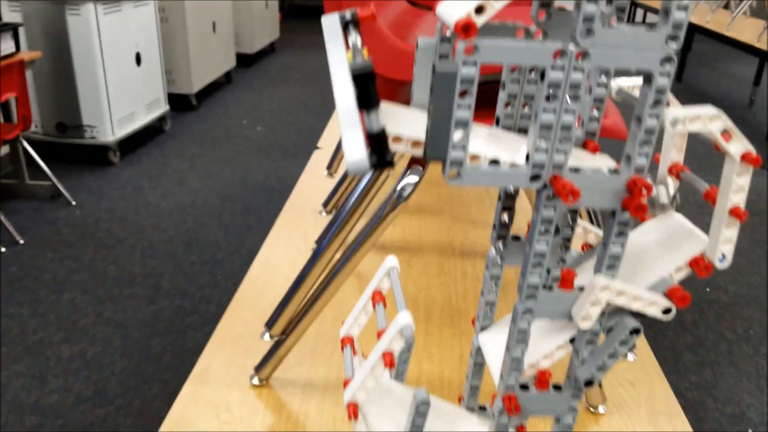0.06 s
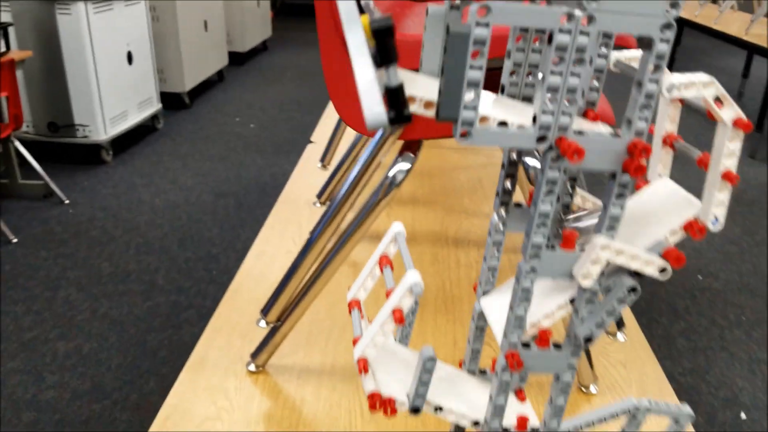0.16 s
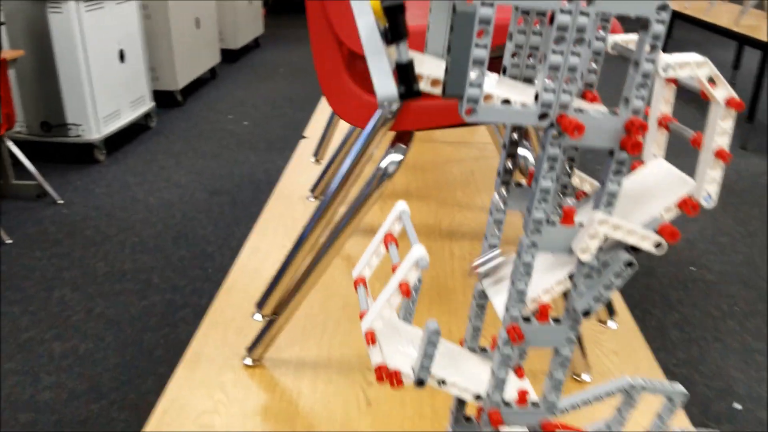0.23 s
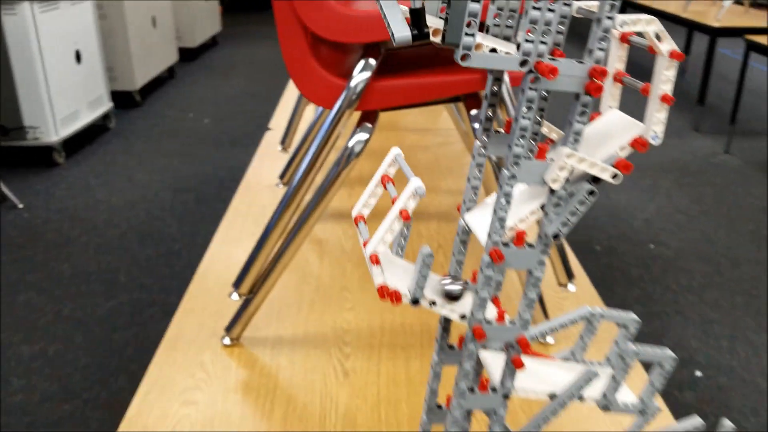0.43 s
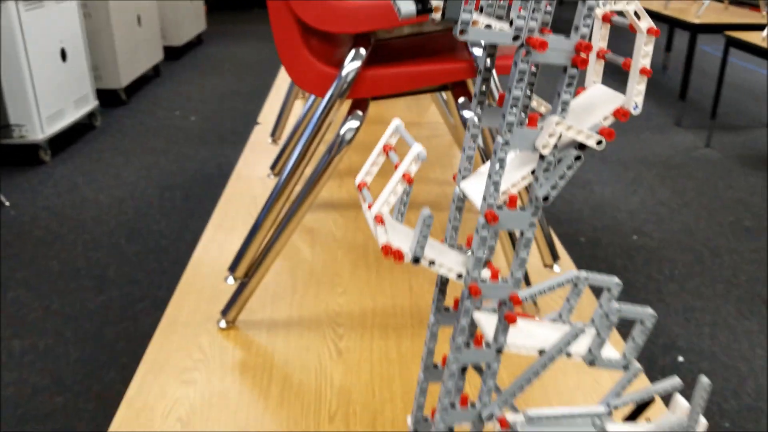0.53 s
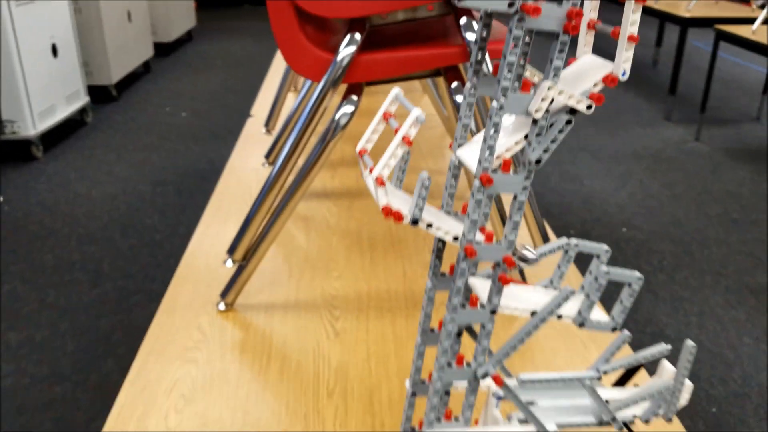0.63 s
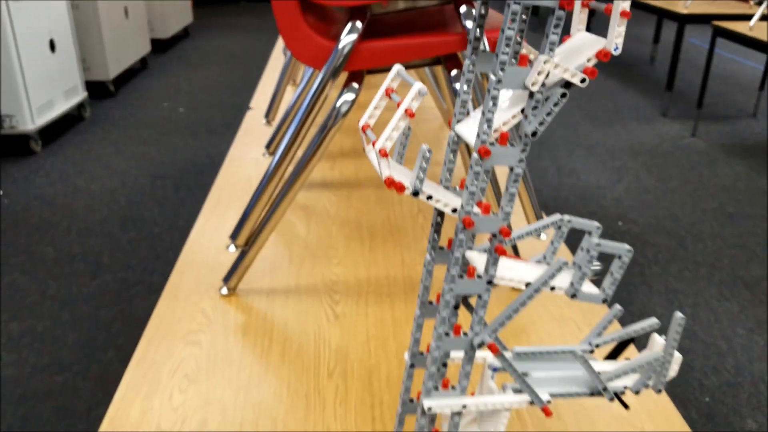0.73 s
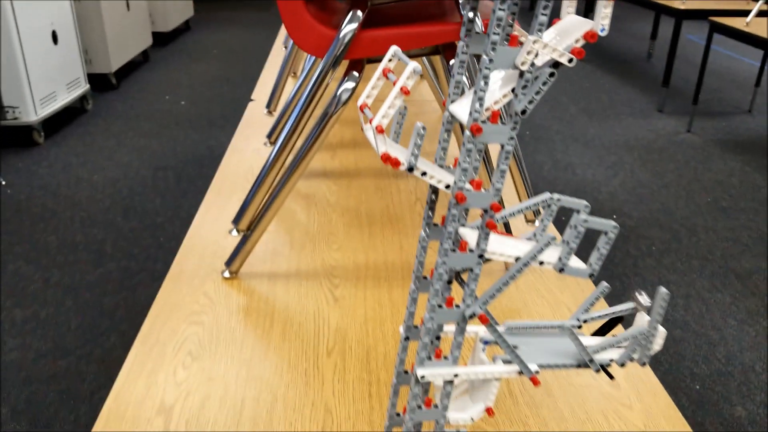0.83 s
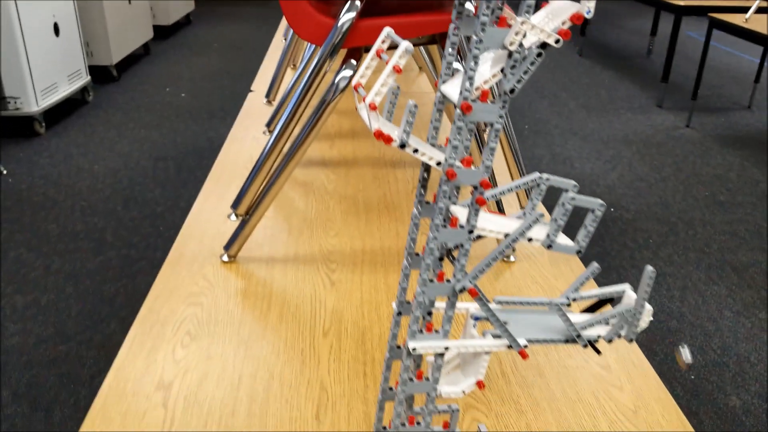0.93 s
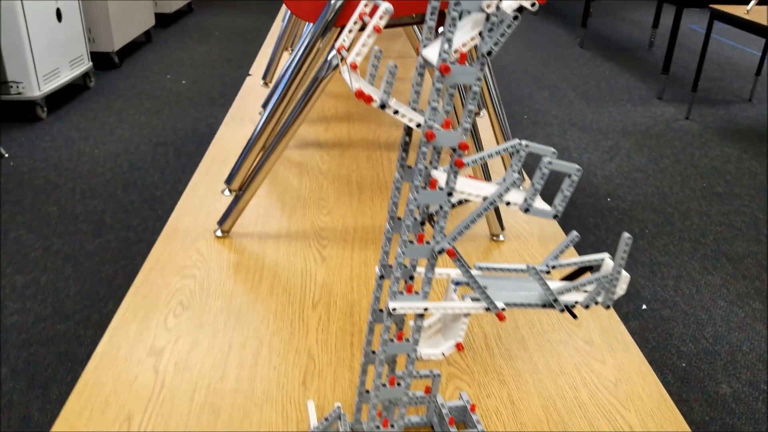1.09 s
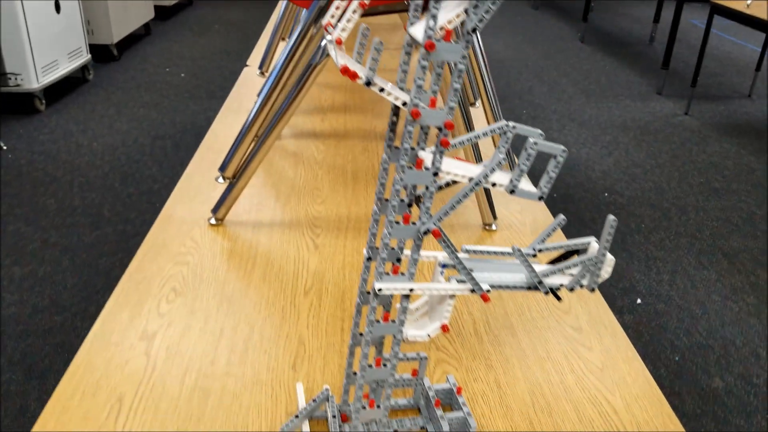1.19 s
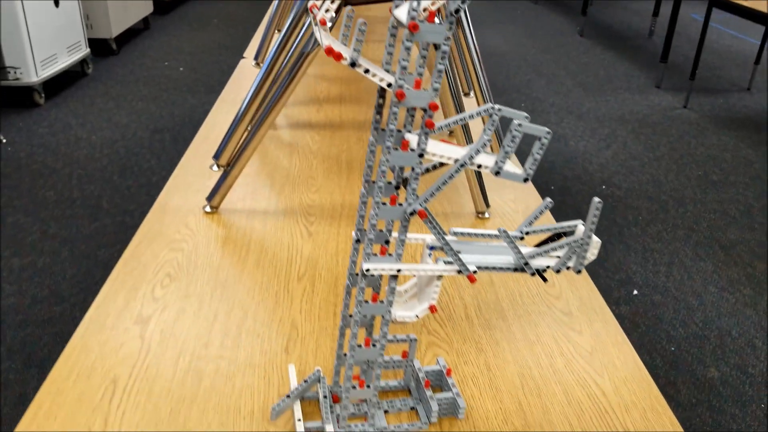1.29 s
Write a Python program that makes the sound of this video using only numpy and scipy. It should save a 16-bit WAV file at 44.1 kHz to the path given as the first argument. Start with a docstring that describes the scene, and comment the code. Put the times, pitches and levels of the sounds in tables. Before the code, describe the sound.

A steel ball drops down a tower of plastic toy slides, giving irregular sharp clicks, a hollow knock and a bright rattling cluster, then a soft dull landing; close microphone, small dry room, faint ventilation.

```python
"""A steel ball drops down a tower of plastic toy slides standing on a classroom table, heard from close by.
Each blow is a shaped noise burst (crack), a longer burst (buzz of the loose beams) and decaying sine waves
(the ringing part). Between blows the ball rolls faintly: sparse random bumps shake the slide.
It lands at the bottom with a dull knock. The table top mirrors every blow with a short delay, and a small
dry room answers, made of fading noise. Ventilation noise, a hum and a low rumble lie underneath."""
import sys
import numpy as np
from scipy import signal
from scipy.fft import rfft, irfft
from scipy.io import wavfile
from scipy.ndimage import uniform_filter1d

SR = 44100
rng = np.random.default_rng(int(sys.argv[2]) if len(sys.argv) > 2 else 0)


def output_pcm(signal):
    """Save a mono or channel-first signal as 16-bit PCM at the path in sys.argv[1].

    Samples are clipped to [-1, 1] before scaling.
    """
    pcm = np.clip(np.atleast_2d(signal).T, -1, 1) * 32767
    wavfile.write(sys.argv[1], SR, np.round(pcm).astype(np.int16))


N = 59535
T = np.arange(N) / SR  # time in seconds
CONTACT_SIZE = 8192  # samples in one crack or buzz
SPREAD_HZ = 3400  # around here the ball's sounds turn from alike to unrelated in left and right
AIR_SPREAD_HZ = 380  # the same for the background


def amp(db):
    """Turn decibels into a gain."""
    return 10 ** (np.asarray(db) / 20)


def unit(x):
    """Scale to an average energy of one per channel."""
    return x / np.sqrt(np.sum(x ** 2) / len(np.atleast_2d(x)))


def fade(t60):
    """Die away exponentially, losing 60 dB in t60 seconds."""
    return np.exp(-np.log(1000) * T / max(t60, 1e-3))


def read(points, hz):
    """Read a table between its points, on a log-frequency axis."""
    f, v = np.array(points).T
    return np.interp(np.log(hz + 1), np.log(f), v)


def axis_hz(x):
    """List the frequencies of a signal's zero-padded spectrum."""
    return np.linspace(0, SR / 2, x.shape[-1] + 1)


def delay(x, s):
    """Start a sound s seconds into the scene."""
    k = int(np.clip(s * SR, 0, N - 1))
    return np.pad(x[:, :N - k], ((0, 0), (k, max(N - k - x.shape[1], 0))))


def colour(x, db):
    """Filter with a gain in dB at each frequency, without any sound ahead of its cause."""
    n = x.shape[-1]
    # folding the cepstrum (the spectrum of the log spectrum) forward makes the filter minimum-phase
    cepstrum = irfft(np.log(amp(db)))
    cepstrum[..., 1:n] *= 2
    cepstrum[..., n + 1:] = 0
    response = np.exp(rfft(cepstrum))
    return irfft(rfft(x, 2 * n) * response)[..., :n]


def stereo(pair, spread_hz):
    """Mix two unrelated signals into left and right: alike in the bass, unrelated in the treble."""
    hz = axis_hz(pair) + 1
    share = hz / np.hypot(hz, spread_hz)
    power = np.array([np.ones_like(hz), share ** 2]) / (1 + share ** 2)
    mid, side = colour(pair, 10 * np.log10(power))
    return np.array([mid + side, mid - side])


def noise():
    """Make two unrelated white noises."""
    return rng.standard_normal((2, N))


def steady(pair, points, spread_hz):
    """Make a coloured stereo sound with an rms of one."""
    coloured = colour(stereo(pair, spread_hz), read(points, axis_hz(pair)))
    return np.sqrt(N) * unit(coloured)


def burst(envelope, count=4, size=40):
    """Densely packed, heavily damped modes of even strength under an envelope."""
    envelope = envelope[:CONTACT_SIZE] + 1e-7
    x = rng.standard_normal((2, CONTACT_SIZE))
    # by turns, follow the envelope in time and flatten the spectrum
    for _ in range(count):
        local_rms = np.sqrt(abs(uniform_filter1d(x ** 2, size)) + 1e-16)
        spectrum = rfft(x * envelope / local_rms)
        x = irfft(spectrum / (abs(spectrum) + 1e-12))
    gate = np.minimum(1, 30 * envelope / envelope.max())  # turns down what is left in the faint end
    return unit(x * gate)


def ventilation():
    """Moving air: steady noise, strongest in the bass."""
    # colour of the air noise: f/Hz, level/dB
    air_colour = [(20, -17), (40, -10), (60, 5), (82, 5.5), (105, -9.5), (170, -17.5), (260, -13.5),
                  (500, -31), (1000, -32), (3000, -37.5), (8000, -41), (15000, -27)]
    return amp(-66.5) * steady(noise(), air_colour, AIR_SPREAD_HZ)


def mains_hum():
    """Mains hum: one steady sine wave, the same in both channels."""
    hum_hz, rms_db = 118.5, -67
    return amp(rms_db) * np.sqrt(2) * np.sin(2 * np.pi * (hum_hz * T + rng.random()))


def low_rumble():
    """Low noise whose level dips and returns, then eases off."""
    # level of the rumble over time: t/s, level/dB
    rumble_level = [(0, -57.5), (.15, -58.5), (.25, -67), (.34, -58.5), (.52, -63.5), (.62, -71),
                    (1.35, -80.5)]
    # colour of the rumble: f/Hz, level/dB
    rumble_colour = [(25, -22), (50, -5.5), (80, 0), (140, -4), (250, -12.5), (450, -26.5), (1200, -37)]
    level_db = np.interp(T, *np.array(rumble_level).T)
    return amp(level_db) * steady(noise(), rumble_colour, AIR_SPREAD_HZ)


def rolling():
    """Tiny bumps under the rolling ball shake the slide, swelling and fading on each stretch."""
    # stretches where the ball rolls along a slide: start t/s, length/s, level/dB
    stretches = [(-.07, 0.14, -56.5), (0.146, 0.27, -62.5), (0.354, 0.1, -61.5), (0.54, 0.12, -68),
                 (0.648, 0.055, -75.5)]
    # colour of the rolling: f/Hz, level/dB
    rolling_colour = [(100, -1.5), (250, 1), (550, -3), (1000, -1.5), (2200, -4.5), (4000, -9),
                      (8000, -12.5), (15000, -14)]
    bumps_per_s = 2400  # on average, at random moments
    bumps = noise() * (rng.random(N) < bumps_per_s / SR)
    shaken = signal.fftconvolve(bumps, burst(fade(0.022)), axes=1)[:, :N]
    swell = 0
    for start, length, db in stretches:
        progress = np.clip((T - start) / length, 0, 1)
        swell = swell + amp(db) * np.sin(np.pi * progress)
    return swell * steady(shaken, rolling_colour, SPREAD_HZ)


def snap_and_crack(crack_t60):
    """Steel meets plastic: a very short snap on top of a crack."""
    snap_t60, snap_db = .004, -4  # s, dB against the crack
    return burst(fade(crack_t60) + amp(snap_db) * fade(snap_t60))


def loose_beam_buzz(buzz_t60, crack_t60):
    """The loose beams chatter unevenly, coming up as the crack dies away."""
    patchy_db, grain_s = 1, .002  # typical size and spacing of the random level changes
    steps = rng.standard_normal(CONTACT_SIZE)
    chatter = amp(patchy_db * np.interp(T / grain_s, np.arange(CONTACT_SIZE), steps))
    return burst(fade(buzz_t60) * chatter * (1 - fade(crack_t60)) ** 2)


def ring(modes):
    """The longer-lived modes of a part are fading sines, each slightly and randomly detuned at every blow."""
    mode_shift = .004  # typical random detuning, as a share of the frequency
    t, out = T[:CONTACT_SIZE * 2], 0
    for hz, db, t60 in modes:
        tuned = hz * (1 + mode_shift * rng.standard_normal())
        phase = rng.random((2, 1)) * min(hz / SPREAD_HZ, 1)  # left and right differ more in the treble
        sine = np.sin(2 * np.pi * (tuned * t + phase))
        out = out + amp(db) * unit(fade(t60)[:len(t)] * sine)
    return unit(out)


def blow(part, bright_db, pan_db, buzz_db):
    """Steel on plastic: crack, buzz and ring. Returns the near sound and what goes into the room."""
    # how each part dies away: ring level/dB, room level/dB, buzz t60/s
    damping = { "top slide": (-12, -10.5, 0.042), "ramp": (-12, -11.5, 0.024),
               "catcher": (-7.5, -7.5, 0.054), "low slide": (-7.5, -5.5, 0.0796),
               "end stop": (-10.5, -10, 0.051), "base": (-7, -5.5, .12), }
    # how fast each part's crack dies away: t60/s
    crack_t60_s = {"top slide": .014, "ramp": .011, "catcher": .012, "low slide": .016, "end stop": .013,
                   "base": .003}
    # colour of each part's crack and buzz: f/Hz, level/dB
    part_colours = { "top slide": [(100, -6.5), (160, 2.5), (300, -13), (520, 1), (700, 4), (1100, -5.5),
                    (2000, 0), (4300, -2.5), (5800, 0.5), (9500, -4), (12600, 1), (15500, 2)],
                    "ramp": [(120, -7.5), (400, -4), (680, 0), (1000, -7), (1300, 5), (1650, 5.5),
                    (2150, -4.5), (2900, 6), (3450, -6), (4900, -9), (5750, 4), (9000, -5.5), (12500, 4),
                    (15500, -1.5)], "catcher": [(150, -9.5), (500, -7.5), (850, 0), (3200, -6), (6200, -1),
                    (8000, -0.5), (9500, -5.5), (12500, -0.5), (15500, -0.5)], "low slide": [(100, -6),
                    (185, 14.5), (290, 0.5), (420, 11.5), (530, 10.5), (780, -8), (1030, 5), (1250, -3),
                    (1600, 9), (2450, 8.5), (3300, -9.5), (5800, -2.5), (7000, -5), (12000, 0),
                    (15500, -4.5)], "end stop": [(150, -12), (700, -13.5), (1500, -6.5), (2400, -1.5),
                    (3300, -6), (5800, -0.5), (7600, 6), (9600, -12), (11800, 5), (15000, 3), (16000, 7.5)],
                    "base": [(100, -3.5), (300, -0.5), (650, 3.5), (1100, -1.5), (1900, -15), (2800, -19),
                    (4000, -26.5), (7500, -37.5), (11000, -27), (15500, -32)], }
    # ringing modes of each part: f/Hz, level/dB, t60/s
    part_modes = { "top slide": [(498, -3.5, 0.079), (584, -6, 0.12), (1854, -2.5, 0.045), (2000, -7, .12),
                  (3110, -7.5, .1), (13590, 0.5, .06)], "ramp": [(1254, -10.5, .2), (1410, -6, 0.13),
                  (1700, -4.5, .2), (2430, -9, 0.27), (2876, 0, 0.047), (2913, 3.5, 0.047),
                  (3800, -3.5, .25), (5900, 1, .15), (5740, -2, 0.2), (6223, -2.5, 0.37), (7500, -6, 0.27),
                  (10750, -5, .15), (12510, -0.5, 0.057)], "catcher": [(830, -10, 0.091), (6350, 1, 0.06),
                  (8075, 6, 0.035), (12550, -6, .05)], "low slide": [(183.3, 3, 0.1276), (432, -5.5, 0.18),
                  (1020, 2.5, 0.19), (1527, 4.5, 0.065), (1864, -20, .15), (2250, -13, 0.11),
                  (2300, -18, 0.16)], "end stop": [(1058, -17, 0.28), (2250, -8, 0.062), (2610, -2.5, 0.15),
                  (4710, -11, 0.081), (7100, 0.5, 0.047), (8050, -2, 0.071), (12570, -4.5, 0.0888),
                  (12040, -7, .08), (14300, -9.5, .09), (14950, -2, .08)], "base": [(340, 1.5, .35),
                  (448, -1.5, .3), (583, 1.5, 0.18), (727, -3, .28), (1008, 0, 0.29)], }
    shade_hz = 3580  # around here left and right begin to differ in level
    blur_hz = 1500  # the room gathers sound from all sides, which evens out the treble peaks and dips

    ring_db, room_db, buzz_t60 = damping[part]
    crack_t60 = crack_t60_s[part]
    strike = snap_and_crack(crack_t60)
    buzz = loose_beam_buzz(buzz_t60, crack_t60)

    hz = axis_hz(strike)
    shape_db = read(part_colours[part], hz) + bright_db * np.log2(hz + 20)
    shape_db = shape_db - 10 * np.log10(np.mean(amp(shape_db) ** 2))  # a colour alone adds no energy
    contact = colour(stereo(strike + amp(buzz_db) * buzz, SPREAD_HZ), shape_db)
    near = np.pad(contact, ((0, 0), (0, CONTACT_SIZE))) + amp(ring_db) * ring(part_modes[part])

    near_hz = axis_hz(near)
    shade_db = pan_db / 2 * near_hz ** 2 / (near_hz ** 2 + shade_hz ** 2)
    near = colour(near, np.array([shade_db, -shade_db]))

    # the room gets a coloured click, smoothed over frequency in the treble
    blur_bins = max(int(2 * blur_hz / hz[1]), 1)
    evened_db = 10 * np.log10(abs(uniform_filter1d(amp(shape_db) ** 2, blur_bins)) + 1e-12)
    treble = hz ** 2 / (hz ** 2 + shade_hz ** 2)
    click = np.eye(1, CONTACT_SIZE)
    radiated = colour(click, shape_db + treble * (evened_db - shape_db))
    return near, amp(room_db) * radiated


def table_echo(near):
    """The table top mirrors every blow: a quieter copy arrives a little later."""
    echo_s, echo_db = .0064, -14
    return amp(echo_db) * delay(near, echo_s)


def room():
    """Room response: a cluster of early reflections and a tail whose bass lasts longest."""
    # how fast the tail dies away: f/Hz, t60/s
    tail_t60 = [(150, 0.95), (500, 0.52), (1500, 0.3), (3000, 0.39), (7000, 0.37), (15000, .24)]
    # colour of the room: f/Hz, level/dB
    room_colour = [(100, 0), (400, 1.5), (1200, 3.5), (3000, 2.5), (7000, -0.5), (15000, -2.5)]
    build_s, spread_hz = .007, 1500
    early_db, early_s, early_width_s = -3, .028, 0.024  # level against the tail, centre, width
    pan_db = 2.5  # left minus right

    freqs = axis_hz(T)
    spectrum = rfft(noise(), 2 * N)
    centres_hz = np.geomspace(100, 16000, 7)
    tail = 0
    # overlapping bands of noise, each with its own decay
    for centre, band in zip(centres_hz, np.eye(len(centres_hz))):
        weight = read(list(zip(centres_hz, band)), freqs)
        tail = tail + irfft(spectrum * weight)[:, :N] * fade(read(tail_t60, centre))
    tail = unit(tail * (1 - np.exp(-(T / build_s) ** 2)))
    early = unit(noise() * np.exp(-((T - early_s) / early_width_s) ** 2 / 2))
    response = colour(stereo(tail + amp(early_db) * early, spread_hz), read(room_colour, freqs))
    return response * amp(np.array([[1], [-1]]) * pan_db / 2)


def scene():
    """Blows with their table echo and room, and rolling, over the background."""
    # blows of the ball: t/s, level/dB, part struck, brightness/dB per octave,
    # treble left minus right/dB, buzz against crack/dB
    ball_blows = [ (0.0464, -39.5, "base", 4.5, 7, -12), (0.1014, -5, "top slide", 0.5, 6.5, -10.5),
                  (.1096, -11.5, "top slide", 0.5, 11, -4.5), (.1160, -24, "top slide", -1, -5, -12),
                  (0.2453, -18.5, "top slide", -0.6, 3, 0.5), (0.253, -23.5, "top slide", 0, 7, 1.5),
                  (0.3086, 0, "ramp", 0, 3, -9), (0.3232, -11.5, "ramp", 2, 16, -5),
                  (0.3259, -15, "ramp", -1.5, 0.5, -27), (.3450, -22, "ramp", 3, -4, -6),
                  (.3610, -22, "ramp", -1.7, 12, -11), (0.3798, -19.5, "ramp", -0.5, -4, -5.5),
                  (.3950, -27.5, "ramp", 0.5, 12, 1), (0.474, -14.5, "catcher", 2.5, 6, 0.5),
                  (0.4815, -23, "catcher", -2.4, -6, -2), (0.6983, -8.5, "low slide", 1.5, 1.5, -1),
                  (0.8565, -9.5, "end stop", -0.75, 2, -9.5), (0.8582, -10, "end stop", -0.5, 7.5, -12),
                  (.8678, 0, "end stop", 1.5, 9.5, -17), (0.8689, -8.5, "end stop", 1.1, 19, -16.5),
                  (.8712, -8, "end stop", -0.3, 2.5, -8.5), (0.8861, -15, "end stop", 1, 12, -2.5),
                  (.8950, -16, "end stop", -1.5, 10, -2), (1.2568, -21, "base", -0.5, 7, -4), ]
    background = ventilation() + mains_hum() + low_rumble()
    near, sent = 0, 0
    for s, db, part, bright_db, pan_db, buzz_db in ball_blows:
        direct, radiated = blow(part, bright_db, pan_db, buzz_db)
        near = near + amp(db) * delay(direct, s)
        sent = sent + amp(db) * delay(radiated, s)
    far = signal.fftconvolve(sent, room(), axes=1)[:, :N]
    return near + table_echo(near) + far + rolling() + background


def record(dry):
    """The recorder cuts the top: a steep low-pass filter removes the highest treble."""
    top_hz = 15800
    low_pass = signal.ellip(8, .2, 60, top_hz, fs=SR, output="sos")  # ripple and cut in dB
    return signal.sosfilt(low_pass, dry)


dry = scene()
out = record(dry)
output_pcm(out)
```